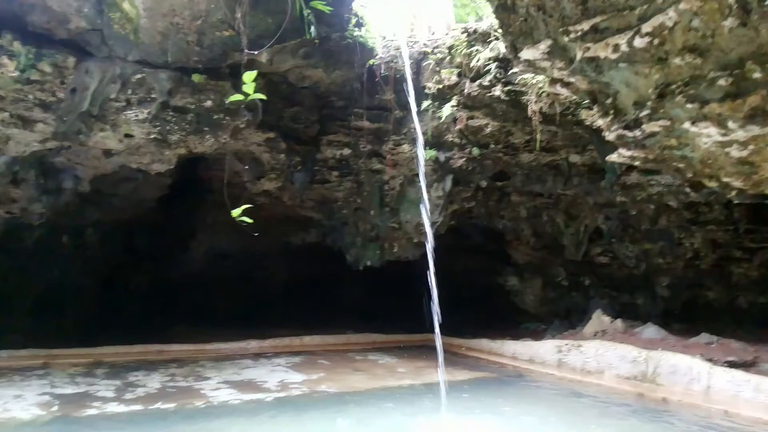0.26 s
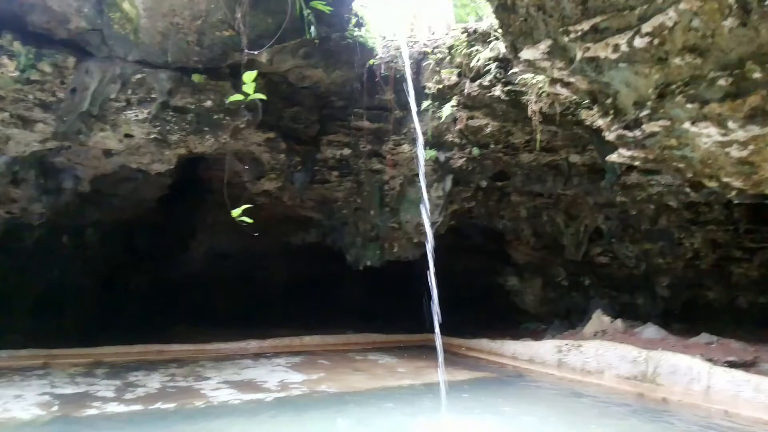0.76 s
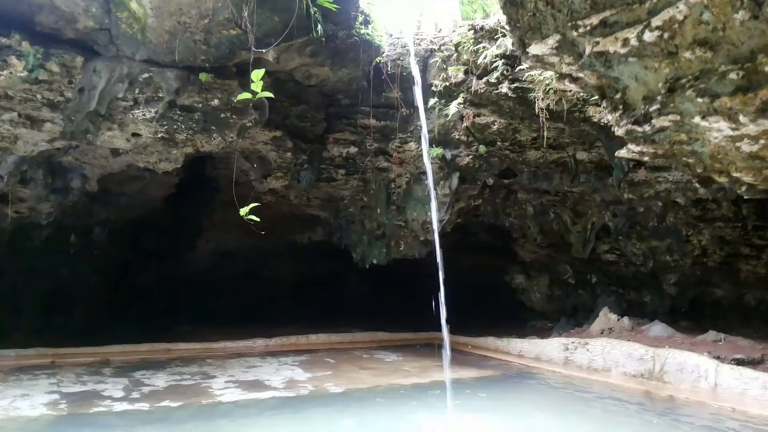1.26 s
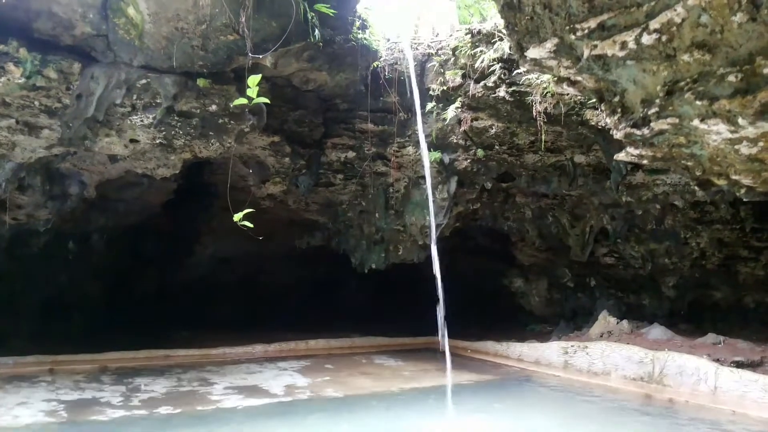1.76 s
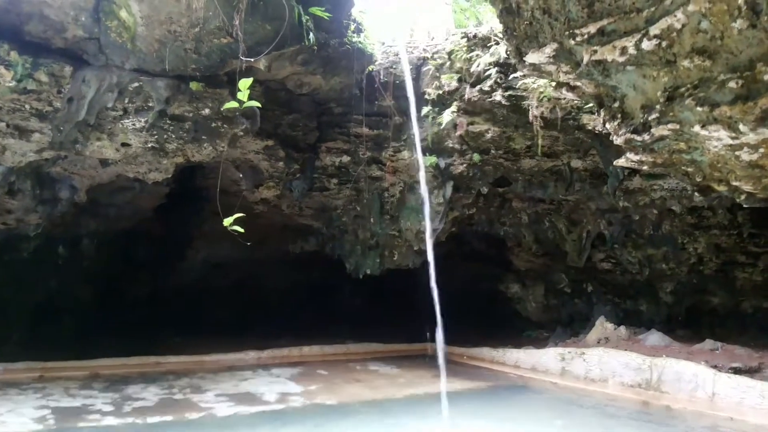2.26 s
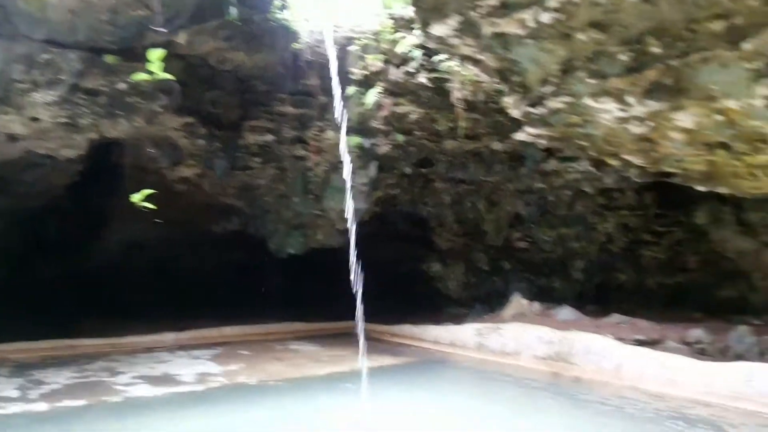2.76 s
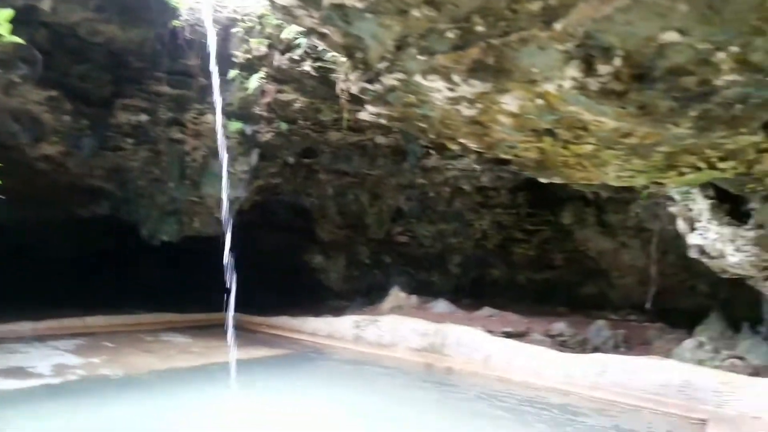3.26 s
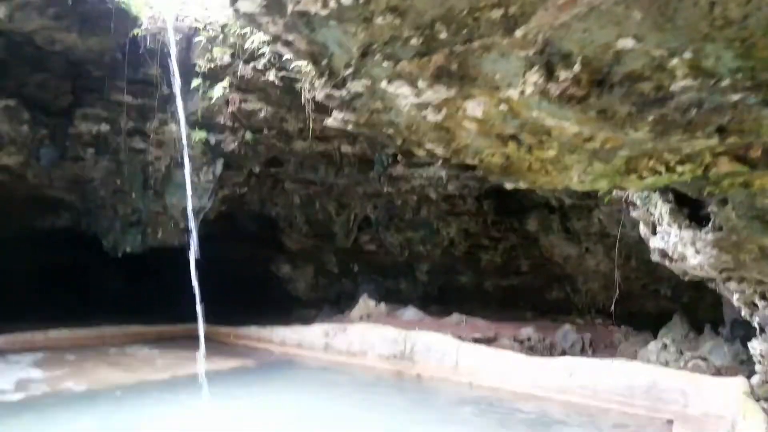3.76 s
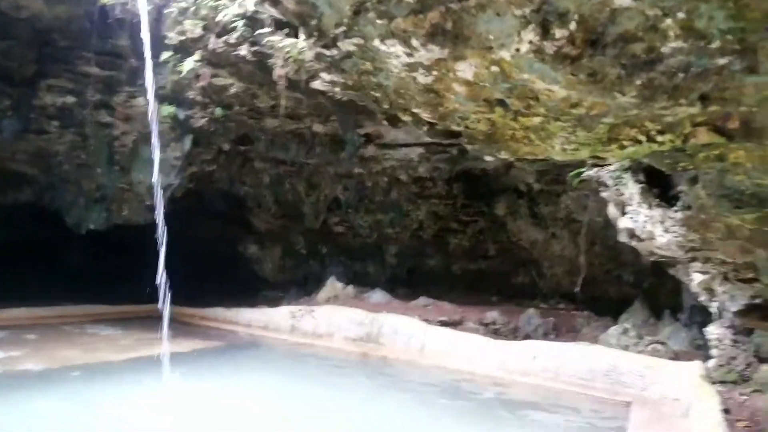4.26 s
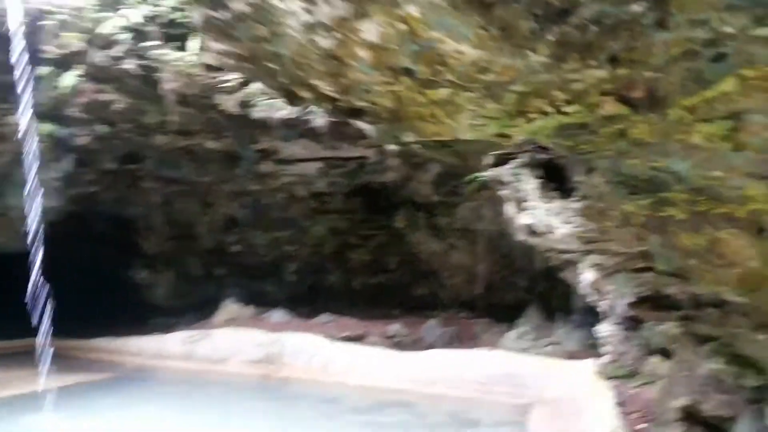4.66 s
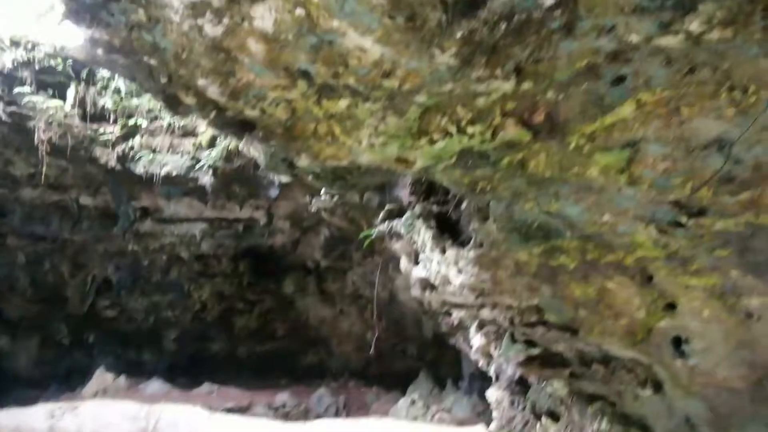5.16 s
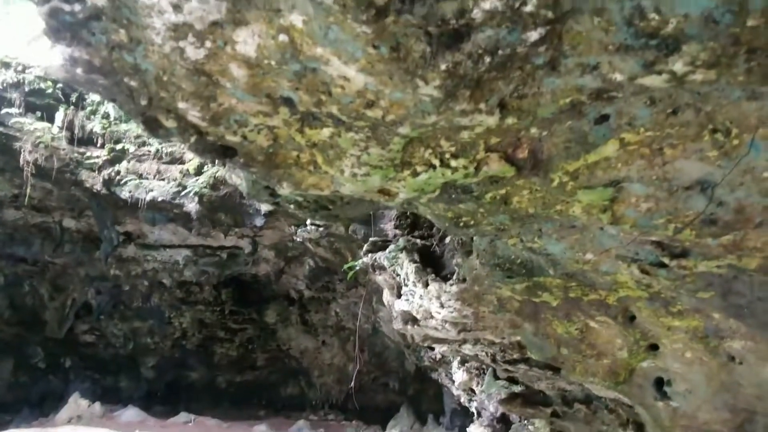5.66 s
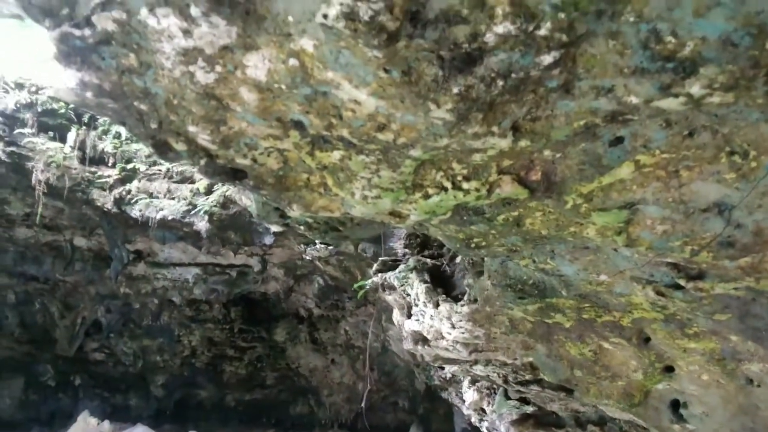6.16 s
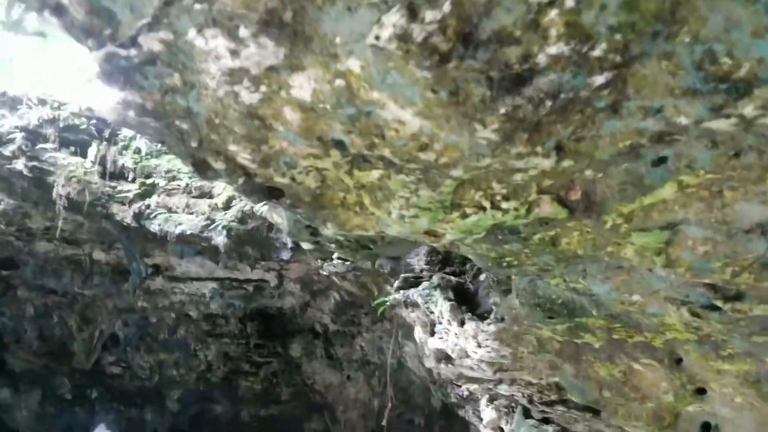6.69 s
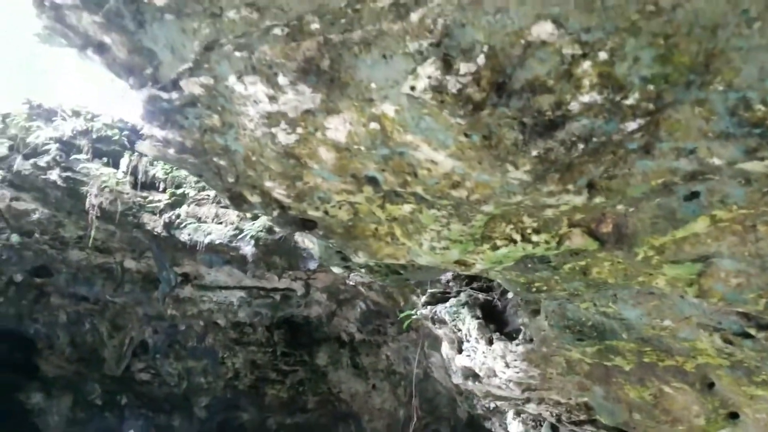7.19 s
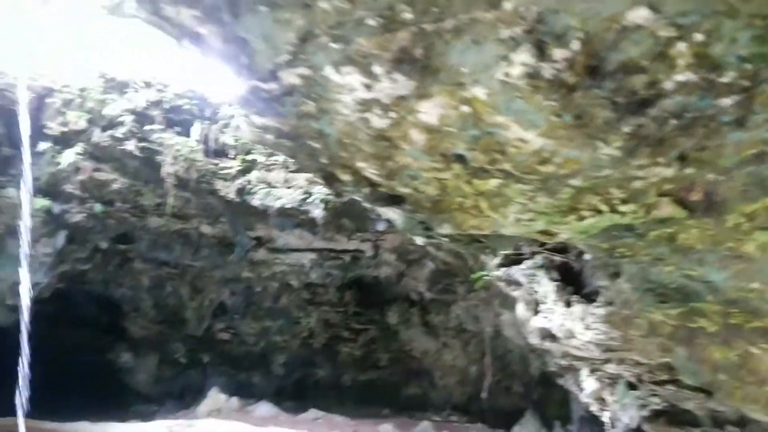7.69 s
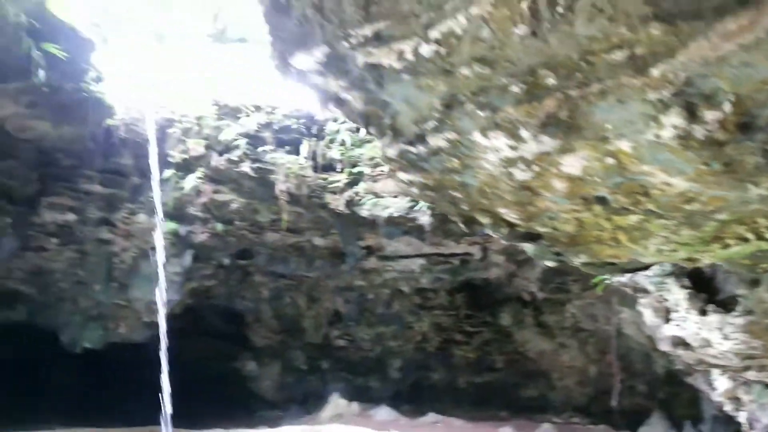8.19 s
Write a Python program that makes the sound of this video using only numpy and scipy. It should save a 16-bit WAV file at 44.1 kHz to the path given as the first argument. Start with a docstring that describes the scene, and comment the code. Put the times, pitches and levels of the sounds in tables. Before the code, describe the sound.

Water falls in a narrow stream onto a cave pool, with uneven slaps, gurgles and a short echo off the rock.

```python
"""A thin waterfall drops through a cave roof into a rock pool. From the start, drops patter and
bubbles ring over churning water. Lumps of the stream slap the surface and plunge in throughout;
large trapped bubbles ring, most in the first second. The cave answers with a diffuse tail.
The sound cuts out briefly at 1.3 s. From 2.6 s the microphone turns toward a side wall, after
4.9 s partly back, shifting the colour. Two more short silences fall at 4.4 and 7.4 s."""
import sys
import numpy as np
from scipy import signal
from scipy.fft import rfft, irfft, next_fast_len
from scipy.io import wavfile
from scipy.ndimage import map_coordinates

SR = 44100
rng = np.random.default_rng(int(sys.argv[2]) if len(sys.argv) > 2 else 0)


def digitize_waveform(pressure):
    """Quantize a signal to 16-bit integers and store it at the path in sys.argv[1].

    Rows of a 2-D input are taken as channels; values are limited to [-1, 1].
    """
    field = np.atleast_2d(pressure).T
    bounded = np.clip(field, -1, 1)
    quanta = np.round(bounded * 32767).astype(np.int16)
    wavfile.write(sys.argv[1], SR, quanta)


N = 371763


def amp(db):
    """dB to gain."""
    return 10 ** (np.asarray(db) / 20)


def unit(x):
    """Scale to rms 1."""
    return x / np.sqrt(np.mean(x ** 2) + 1e-20)


def along(points, hz):
    """Interpolate (f/Hz, value) points on a log frequency axis."""
    points_hz, values = np.transpose(points)
    return np.interp(np.log(hz + 1), np.log(points_hz), values)


def bells_db(rows, hz):
    """Sum of peaks and dips; rows: f/Hz, width/Hz, gain/dB."""
    return sum(db / (1 + (2 * (hz - centre_hz) / width_hz) ** 2) for centre_hz, width_hz, db in rows)


def wobble(rate_hz):
    """Smooth random curve with knots at rate_hz."""
    knots = rng.standard_normal(int(N * rate_hz / SR) + 4)
    return map_coordinates(knots, [np.arange(N) * rate_hz / SR])


def coloured(x, db_of_hz):
    """Minimum-phase filter with the given dB response."""
    size = 2 * next_fast_len(N // 2 + SR // 10)
    gain = amp(db_of_hz(np.fft.rfftfreq(size, 1 / SR)))
    cepstrum = irfft(np.log(gain), size)
    cepstrum[1:size // 2] *= 2
    cepstrum[size // 2 + 1:] = 0
    return irfft(rfft(x, size) * np.exp(rfft(cepstrum)), size)[:N]


def shaped(x, spectrum):
    """Give a white signal a spectrum at equal power."""
    power = np.mean(amp(along(spectrum, np.arange(SR // 2))) ** 2)
    return coloured(x, lambda hz: along(spectrum, hz)) / np.sqrt(power)


def add(track, start_s, sound):
    """Mix sound into track at start_s."""
    start = int(np.clip(round(start_s * SR), 0, N))
    track[start:start + len(sound)] += sound[:N - start]


def impacts(rate_hz, scatter_db):
    """Drops land as randomly timed impulses of uneven size; rms 1."""
    lands = rng.random(N) < rate_hz / SR
    polarity = np.sign(rng.standard_normal(N))
    size = amp(scatter_db * np.clip(rng.standard_normal(N), -2, 2))
    return unit(lands * polarity * size)


def bubbles(count, low_hz, high_hz, cycles, rise, scatter_db):
    """Bubbles ring down and rise in pitch as they near the surface; rms 1."""
    when, pitch, life, loudness = rng.random((count, 4)).T[:, :, None]
    hz = low_hz * (high_hz / low_hz) ** pitch
    t = np.arange(SR // 25) / SR
    age = t * hz / (cycles * (0.5 + life))
    level_db = scatter_db * np.minimum(-np.log(loudness), 4)
    envelope = amp(level_db - 60 * age) * (1 - t / t[-1]) * np.sqrt(hz / high_hz)
    rings = envelope * np.sin(2 * np.pi * hz * t * (1 + rise * np.minimum(age, 1)))
    samples = (when * N).astype(int) + np.arange(len(t))
    return unit(np.bincount(samples.ravel(), rings.ravel(), N)[:N])


def pour():
    """The stream churns the pool, sprays drops on it and drives air under; all follow its flow."""
    # strength of the pour: t/s, level/dB
    flow = [(0, -22.5), (0.7, -24.5), (1.6, -25), (2.25, -25), (2.7, -23), (3.25, -26), (4.2, -24.8),
            (4.65, -26.5), (5, -24.5), (6.2, -25.5), (8.42, -24.5)]
    # spectrum of the churning pool: f/Hz, density/dB
    churn_spectrum = [(25, -52), (45, -45), (70, -22), (100, -15.5), (190, -6), (350, 4), (800, 2.5),
                      (1350, -2), (2100, 3), (3300, -4), (5000, -19), (6300, -34), (15500, -31)]
    # spectrum of the pattering drops: f/Hz, density/dB
    patter_spectrum = [(40, -56), (100, -28), (250, -4.5), (800, -0.5), (1350, -6), (2100, 2), (3300, -6.5),
                       (5000, -24), (6300, -34.5), (15500, -37.5)]
    flow_db = np.interp(np.arange(N) / SR, *np.transpose(flow)) + 0.5 * wobble(rate_hz=24)
    churn = amp(-1) * shaped(rng.standard_normal(N), churn_spectrum)
    patter_db = -4 + wobble(rate_hz=60)
    patter = amp(patter_db) * shaped(impacts(rate_hz=1100, scatter_db=3.5), patter_spectrum)
    burble = bubbles(count=900, low_hz=598, high_hz=1814, cycles=49, rise=0.071, scatter_db=4)
    gurgle = bubbles(count=500, low_hz=195, high_hz=761, cycles=31, rise=0.079, scatter_db=3.5)
    return amp(flow_db) * (churn + patter + amp(-12) * burble + amp(-15.5) * gurgle)


def small_lumps(count, mean_db, spread_db):
    """Small lumps break off the stream at uneven intervals; rows: t/s, level/dB, depth/1."""
    jitter, size, depths = rng.random((count, 3)).T
    times_s = (np.arange(count) + jitter) / count * N / SR
    return np.column_stack([times_s, mean_db + spread_db * (2 * size - 1), depths])


def landing_envelope(depth, attack_s):
    """A landing builds, holds while the lump goes in, then dies with the falling spray."""
    hold_s, release_t60_s = 0.019 + 0.018 * depth, 0.14
    t = np.arange(SR // 2) / SR
    released_s = np.maximum(t - hold_s, 0)
    return amp(-60 * released_s / release_t60_s) * (1 - np.exp(-t / attack_s))


def splashes():
    """Each lump smacks; a flat one throws spray, a deep one slaps and its cavity closes low."""
    # large lumps landing: t/s, level/dB, depth/1 (0 flat, all spray; 1 deep, hollow)
    large_lumps = [(0.06, -19, 0.4), (0.097, -27.7, 0.94), (0.228, -26.6, 0), (0.321, -24.5, 0.95),
                   (0.494, -21, 0.7), (0.528, -20, 0.45), (0.682, -23, 0.3), (0.766, -28, 0.5),
                   (1.127, -24.5, 0.73), (1.725, -21.5, 0.5), (1.773, -21, 0.55), (2.34, -21, 0.2),
                   (2.448, -19, 0.38), (2.53, -21.3, 0.5), (2.64, -23, 0.8), (2.7, -20.5, 0.6),
                   (2.787, -25.5, 0.6), (2.837, -24.5, 0.55), (3.461, -26, 0.3), (3.52, -27, 0.2),
                   (3.645, -29, 0.76), (4.057, -23, 0.5), (4.311, -22.5, 0.36), (4.747, -26, 0.3),
                   (4.849, -20.5, 0.3), (4.919, -24.5, 0.57), (5.061, -22, 0.52), (5.24, -21, 0.53),
                   (5.275, -17.5, 0.49), (5.614, -26.0, 0.2), (5.7, -22.5, 0.5), (5.944, -24.5, 0.48),
                   (6.026, -20.5, 0.42), (6.453, -25.5, 0.8), (6.513, -23.5, 0.6), (6.549, -19, 0.45),
                   (6.775, -25.5, 0.4), (6.837, -25.3, 0.5), (7.012, -24.5, 0.62), (7.147, -22.5, 0.6),
                   (7.207, -27, 0.2), (7.627, -27.3, 0.5), (7.768, -24, 0.41), (7.955, -23, 0.1),
                   (8.073, -21.5, 0.3), (8.343, -20.5, 0.63)]
    # thrown spray: f/Hz, density/dB
    spray_spectrum = [(300, -46.5), (1000, -14.5), (1600, 1.5), (2200, 3.5), (3300, -5), (5000, -20),
                      (6500, -34.5), (15500, -34)]
    # slap on the surface: f/Hz, density/dB
    slap_spectrum = [(100, -46), (400, -8), (700, 0), (1100, 0), (1600, -7.5), (3000, -18.5), (8000, -57.5)]
    # closing cavity: f/Hz, density/dB
    plunge_spectrum = [(35, -33.5), (90, -17.5), (200, -3), (400, 1.5), (700, -3), (2500, -55), (6000, -79)]
    attack_s, smack_db = 0.001, 20
    lumps = np.vstack([large_lumps, small_lumps(count=30, mean_db=-33, spread_db=3.5)])
    times_s, levels_db, depths = lumps.T
    parts = [(spray_spectrum, amp(-0.5) * np.sqrt(1 - depths)),
             (slap_spectrum, amp(-2.5) * np.sqrt(depths)),
             (plunge_spectrum, amp(-5) * depths)]
    track = np.zeros(N)
    for spectrum, shares in parts:
        smacks, power = np.zeros((2, N))
        for start_s, gain, depth in zip(times_s, amp(levels_db) * shares, depths):
            add(smacks, start_s + attack_s, [gain * amp(smack_db)])
            add(power, start_s, (gain * landing_envelope(depth, attack_s)) ** 2)
        drops = unit(impacts(rate_hz=1200, scatter_db=3.5) + amp(-4.5) * rng.standard_normal(N))
        track += shaped(smacks + np.sqrt(power) * drops, spectrum)
    return track


def glugs(attack_s=0.00045):
    """Large trapped bubbles ring at one pitch each."""
    # bubble rings: t/s, f/Hz, level/dB, t60/s
    large_bubbles = [(.062, 1140, -7.5, 0.015), (0.075, 1700, -7.5, 0.018), (.15, 300, -20, 0.068),
                     (.322, 213, -24, .099), (.355, 806, -14.5, .039), (.527, 640, -19, 0.085),
                     (.686, 1440, -12.5, 0.028), (1.01, 658, -26, 0.39), (4.771, 220, -30, .12),
                     (4.915, 194.5, -31.5, 0.17), (5.277, 930, -12.5, .07), (8.346, 995, -18, 0.37)]
    track, t = np.zeros(N), np.arange(SR // 4) / SR
    for start_s, hz, level_db, t60_s in large_bubbles:
        envelope = amp(level_db - 60 * t / t60_s) * (1 - np.exp(-t / attack_s))
        add(track, start_s, envelope * np.sin(2 * np.pi * hz * t))
    return track


def cave(water, build_s=0.0052):
    """Rock walls return a diffuse tail, shortest in the bass; the tail is drawn afresh every quarter second."""
    # decay of the cave: f/Hz, t60/s
    decay = [(100, 0.36), (1000, 0.86), (4000, 0.83), (15000, 0.89)]
    wet, block = np.zeros(N), SR // 4
    for start in range(0, N, block):
        hz, t, noise = signal.stft(rng.standard_normal(SR // 2), SR, nperseg=256)
        t60_s = along(decay, hz)[:, None]
        tail = signal.istft(noise * amp(-60 * t / t60_s), SR, nperseg=256)[1]
        tail *= 1 - np.exp(-np.arange(len(tail)) / SR / build_s)
        tail /= np.linalg.norm(tail)
        add(wet, start / SR, signal.fftconvolve(water[start:start + block], tail))
    return wet


def side_wall(x):
    """The side wall reinforces some bands as the microphone turns toward it."""
    # turn toward the wall: t/s, share/1
    turn = [(0, 0), (2.6, 0), (4.2, 0.3), (4.9, 1), (7.4, 0.7), (8.4, .3)]
    # bands the wall reinforces: f/Hz, width/Hz, gain/dB
    wall_peaks = [(187, 21, 2), (590, 96, 3), (693, 93, 4), (1820, 210, 2), (5540, 2200, 3)]
    share = np.interp(np.arange(N) / SR, *np.transpose(turn))
    return (1 - share) * x + share * coloured(x, lambda hz: bells_db(wall_peaks, hz))


def scene():
    """Water heard directly and off the walls, coloured by the rock hollow; mono."""
    # resonances and dips of the hollow: f/Hz, width/Hz, gain/dB
    hollow = [(145.6, 21, 7), (169, 13, -3.5), (198, 13, 5.5), (263.4, 14, 5), (395, 30, 1),
              (584, 49, -4.5), (700, 35, 0), (1058, 55, 2)]
    water = amp(-1) * pour() + amp(0.6) * splashes() + amp(2) * glugs()
    in_cave = amp(-1.5) * water + amp(-8.5) * cave(water)
    in_hollow = coloured(in_cave, lambda hz: bells_db(hollow, hz))
    return side_wall(in_hollow)[None]


def record(dry):
    """Microphone colour, bass cut, three silences with quick fades, band limit."""
    # notches and broad peak of the microphone port: f/Hz, width/Hz, gain/dB
    port = [(8260, 260, -18), (9250, 600, -4), (13550, 2300, 6.5), (15900, 1200, -3)]
    # silences: start/s, end/s
    silences = [(1.279, 1.451), (4.386, 4.552), (7.373, 7.541)]
    low_hz, top_hz = 64, 15750
    close_s, reopen_s = 0.002, 0.012
    t = np.arange(N) / SR
    x = coloured(dry[0], lambda hz: bells_db(port, hz))
    x = signal.sosfilt(signal.butter(6, low_hz, "high", fs=SR, output="sos"), x)
    for start_s, end_s in silences:
        closing = np.clip((start_s - t) / close_s, 0, 1)
        opening = 1 - np.exp(-np.maximum(t - end_s, 0) / reopen_s)
        x *= closing + opening
    passband = np.fft.rfftfreq(N, 1 / SR) < top_hz
    return irfft(rfft(x) * passband, N)[None]


dry = scene()
out = record(dry)
digitize_waveform(out)
```